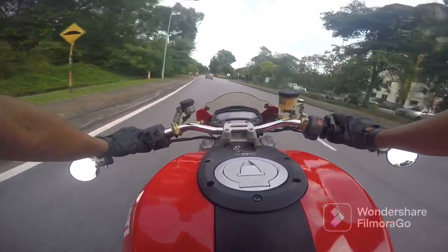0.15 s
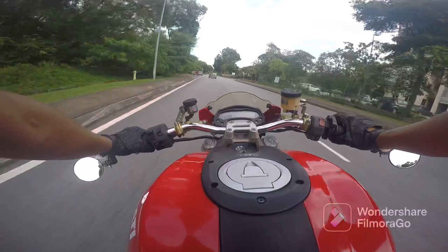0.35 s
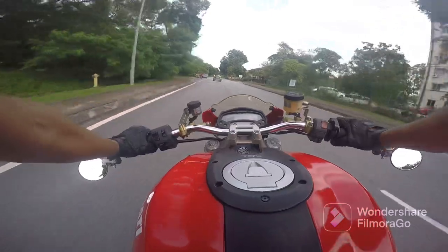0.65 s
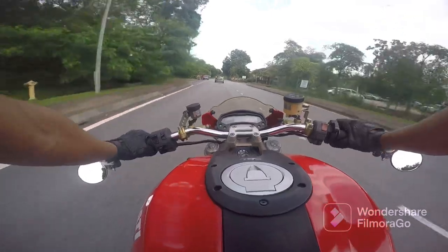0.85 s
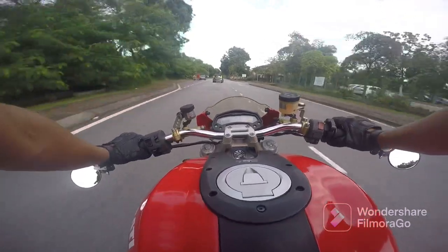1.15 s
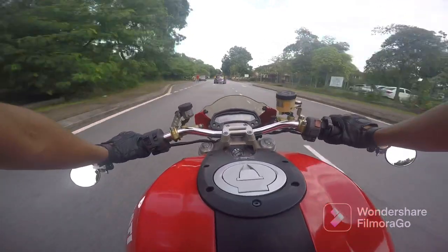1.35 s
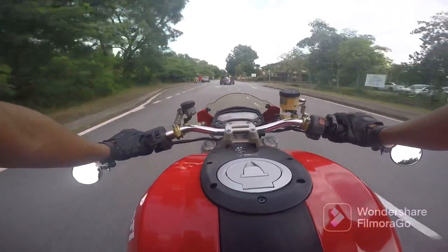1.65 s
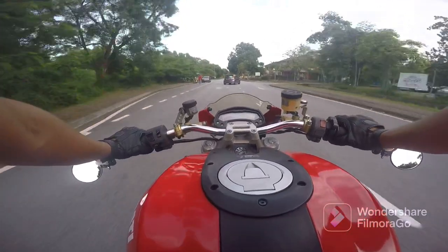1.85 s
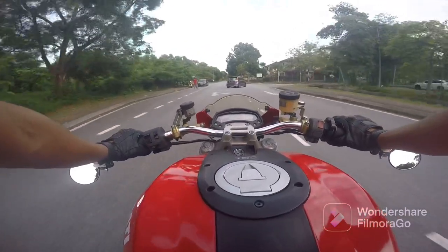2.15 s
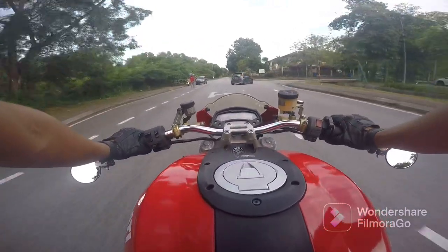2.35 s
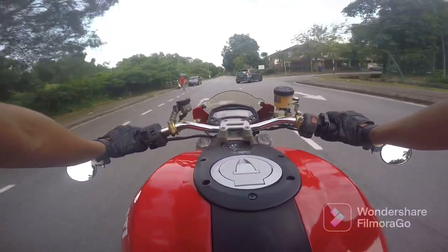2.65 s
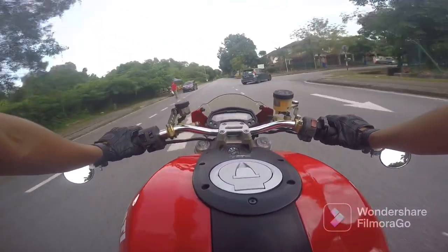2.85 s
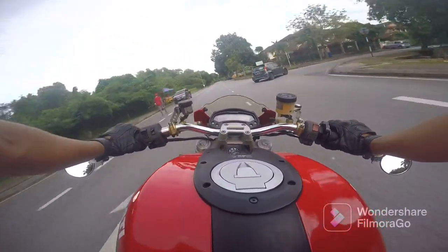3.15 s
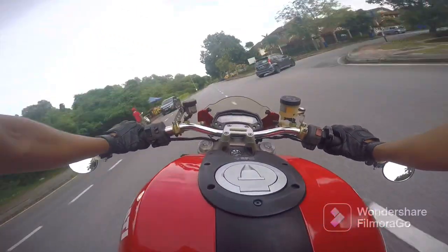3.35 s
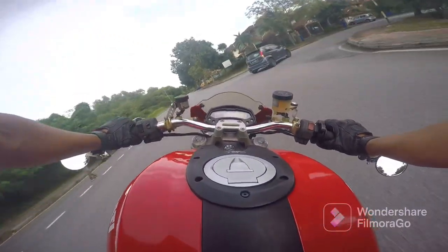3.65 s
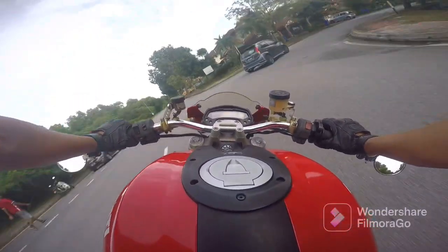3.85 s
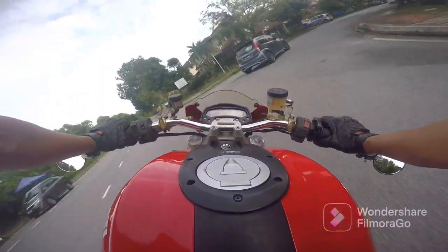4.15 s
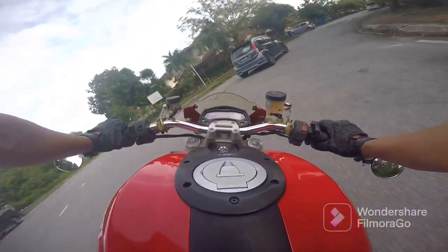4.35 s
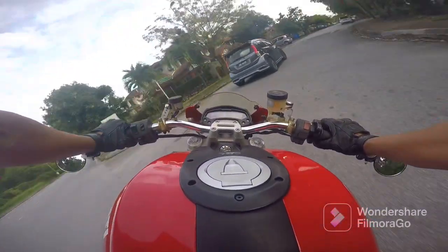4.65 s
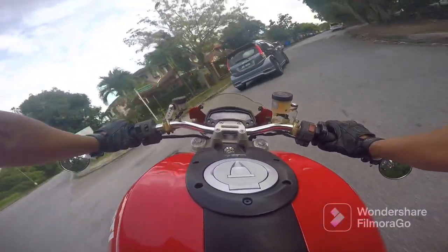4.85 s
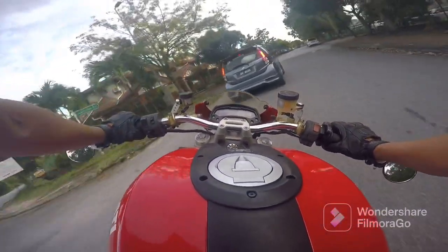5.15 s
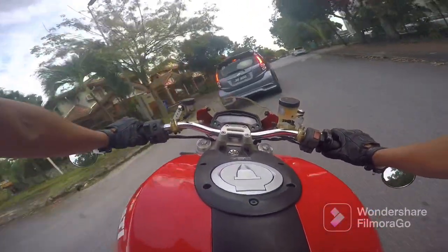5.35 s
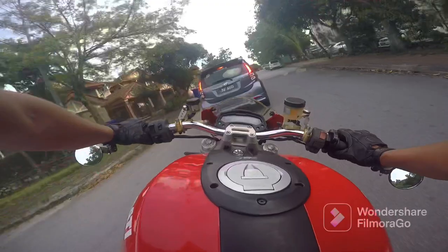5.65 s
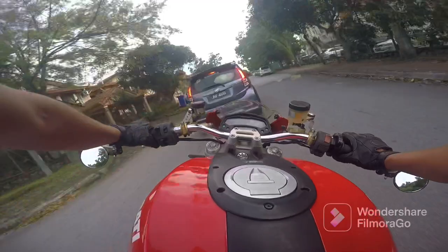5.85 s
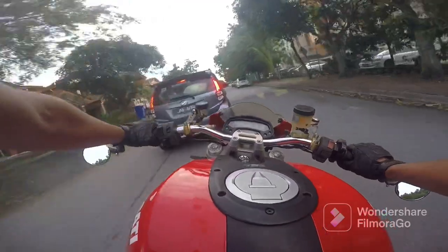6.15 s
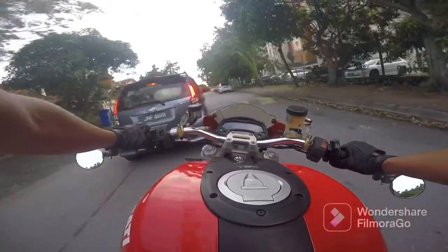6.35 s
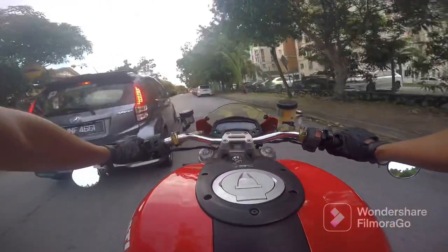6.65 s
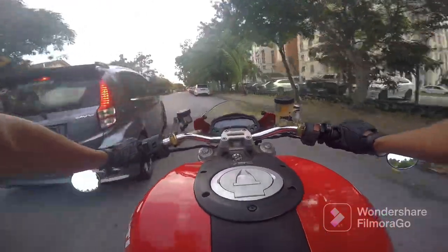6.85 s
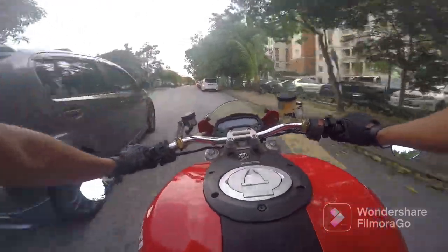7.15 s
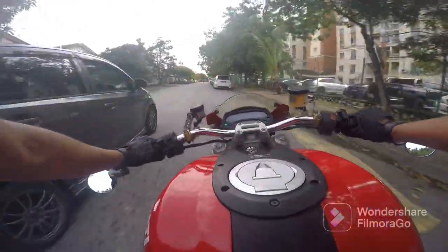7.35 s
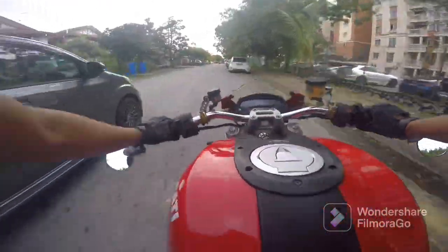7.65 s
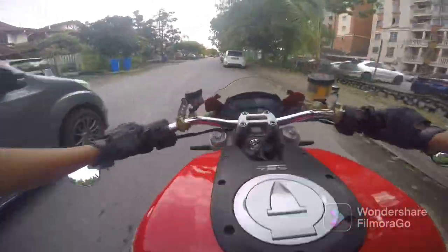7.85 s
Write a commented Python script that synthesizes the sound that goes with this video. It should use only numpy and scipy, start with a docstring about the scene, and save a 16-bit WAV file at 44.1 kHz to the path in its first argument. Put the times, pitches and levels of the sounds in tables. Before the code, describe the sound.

Onboard motorcycle outdoors on a road: low throbbing exhaust, dry mechanical rattle and soft wind buffeting. Early pops crackle as the throttle closes, then a quick rev and gear clunk raise the pitch. The engine coasts down for several seconds to a slow, irregular thudding. Another short blip with a knock comes late, then steady light throttle brings firmer, low-revving pulses to the end.

```python
"""A 90-degree V-twin motorcycle, heard from the rider's chest: it rolls off with a few pops in the exhaust,
shifts down, slows through a bend, shifts down again and pulls away gently.
Uneven exhaust pulses ring the silencer and header pipes as damped resonances; pops ring them too.
Valve taps, drive noise and gear teeth excite the cases; filtered noise beneath gives wind and tyre hiss."""
import sys
import numpy as np
from scipy import signal
from scipy.fft import rfft, irfft, next_fast_len
from scipy.io import wavfile
from scipy.ndimage import uniform_filter1d

SR = 44100
rng = np.random.default_rng(int(sys.argv[2]) if len(sys.argv) > 2 else 0)


def materialize(psi):
    """Save the field psi as 16-bit PCM at rate SR to the path in sys.argv[1].

    A 1-D psi becomes a single channel; in a 2-D psi each row is a channel.
    """
    bounded = np.clip(np.atleast_2d(psi).T, -1, 1)
    quanta = np.round(bounded * 32767).astype(np.int16)
    wavfile.write(sys.argv[1], SR, quanta)


N = 351918
TIME = np.arange(N) / SR

# one cycle is the four strokes, two crank turns; the second cylinder fires this fraction of it later
SECOND_CYLINDER = 450 / 720
IDLE_HZ = 14  # cycles per second

# silencer resonances: centre_hz, width_hz, level_db
SILENCER_MODES = [(66.8, 17.5, 34.5), (125.2, 24, 18)]
# crankcase and cover resonances: centre_hz, width_hz, level_db
CASE_MODES = [(755, 130, -10.5), (1003, 270, -9.5), (1690, 284, -8.5), (1870, 86, -11), (2312, 220, 0),
              (2530, 286, 0), (3380, 410, -5.5), (3644, 184, 1), (3880, 520, -9), (4170, 133, -6),
              (4585, 78, -8.5), (5540, 98, -21), (6660, 1100, -31.5), (7520, 570, -23.5)]
# throttle blips before the downshifts: start_s, rise_s, fall_s, added_cycles_per_s
THROTTLE_BLIPS = [(.65, .2, .18, 5.71), (6.3, .2, .37, 3.85)]


def undb(db):
    """Amplitude ratio: 20 dB is a factor of ten."""
    return 10 ** (np.asarray(db) / 20)


def curves(table):
    """Linear interpolation in time of every column after the first."""
    s, *columns = np.transpose(table)
    return [np.interp(TIME, s, column) for column in columns]


def unit(x):
    """Normalisation to an rms of 1."""
    return x / np.sqrt(np.mean(x ** 2))


def even(x, size=8000):
    """Slow gain control: the running rms is held near 1 while single pulses survive; size in samples."""
    power = uniform_filter1d(uniform_filter1d(x ** 2, size), size)
    return x / np.sqrt(power + 1e-18)


def resonate(x, modes, order=1):
    """Modal superposition: a sum of damped resonances; a higher order gives steeper skirts."""
    out = 0
    for hz, width_hz, db in modes:
        b, a = signal.iirpeak(hz, hz / width_hz, SR)
        sections = np.tile(np.r_[b, a], (order, 1))
        out = out + undb(db) * signal.sosfilt(sections, x)
    return out


def lowpass(x, hz, order=2):
    """Low-pass filtering: the spectrum rolls off above hz."""
    return signal.sosfilt(signal.butter(order, hz, fs=SR, output="sos"), x)


def colour(x, points):
    """Spectral shaping by (hz, level_db) points joined along a logarithmic frequency axis."""
    hz, db = np.transpose(points)
    size = next_fast_len(N)
    f = np.maximum(np.fft.rfftfreq(size, 1 / SR), 1)
    gain = undb(np.interp(np.log(f), np.log(hz), db))
    return irfft(rfft(x, size) * gain, size)[:N]


def walk(rate):
    """Slow random fluctuation, spread near 1: rate random steps per second, smoothed twice."""
    k = int(SR / rate)
    steps = np.repeat(rng.standard_normal(N // k + 1), k)
    return 0.72 * uniform_filter1d(uniform_filter1d(steps, k), k)[:N]


def impulses(times, sizes):
    """Impulse excitation: one click of the given size at each time."""
    samples = np.clip(np.asarray(times) * SR, 0, N - 1).astype(int)
    return np.bincount(samples, sizes, N)


def fade(clicks, time_s):
    """Exponential decay: every click gains a tail with this time constant."""
    return signal.lfilter([1], [1, -np.exp(-1 / (time_s * SR))], clicks)


def puffs(clicks, time_s):
    """Turbulence: a decaying noise burst after each click, its energy independent of its length."""
    return fade(clicks, time_s) * rng.standard_normal(N) * np.sqrt(2 / (time_s * SR))


def hump(start_s, length_s):
    """Half-sine pulse: a smooth rise from 0 to 1 and back."""
    return np.sin(np.pi * np.clip((TIME - start_s) / length_s, 0, 1))


def road_air():
    """Turbulent flow is broadband: wind buffets the microphone; tyres and passing air hiss."""
    # air and tyre hiss: time_s, level_db
    hiss_levels = [(.4, -67), (2, -71), (4.3, -65.5), (5.5, -73), (6.7, -97), (7.6, -72)]
    # wind: time_s, level_db
    wind_levels = [(0, -36.5), (3, -41), (7.98, -50)]
    # spectrum of the hiss: frequency_hz, level_db
    hiss_spectrum = [(2000, -29), (5500, 3.5), (7000, 13), (8500, 5.5), (10000, -1), (12000, -10),
                     (15000, -17)]
    # spectrum of wind on the microphone: frequency_hz, level_db
    wind_spectrum = [(8, -43), (24, -1), (45, -4), (90, -8.5), (180, -19.5), (400, -33.5), (1000, -37.5),
                     (4000, -77)]
    (hiss_db,), (wind_db,) = curves(hiss_levels), curves(wind_levels)
    hiss = unit(colour(rng.standard_normal(N), hiss_spectrum)) * undb(hiss_db + 0.48 * walk(25))
    wind = unit(colour(rng.standard_normal(N), wind_spectrum)) * undb(wind_db + 2 * walk(5.86))
    return hiss + wind


def engine_speed():
    """Rigid gearing: the road turns the engine; each blip spins it up and lets it sink back."""
    # engine speed, stepping up from 1.03 s when the lower gear bites: time_s, cycles_per_s
    road_speed = [(0, 28.55), (.3, 28.27), (1.03, 24.51), (1.23, 31.07), (1.7, 29.05), (2.9, 25.39),
                  (3.8, 24.12), (4.5, 21.03), (5.6, 15.29), (6.3, 13.43), (7.15, 13.295), (7.8, 15.26),
                  (7.98, 14.33)]
    cycle_hz = curves(road_speed)[0]
    for s, rise, fall, hz in THROTTLE_BLIPS:
        cycle_hz = cycle_hz + np.interp(TIME, [s, s + rise, s + rise + fall], [0, hz, 0])
    return cycle_hz


def drive():
    """Firing strength from 0 to 1 is a sum of contributions: the grip, the blips and catches near idle."""
    # twist grip, nearly shut until the bike pulls away: time_s, throttle
    grip = [(6.78, 0.2), (6.9, 0.9), (7.6, 0.89), (7.98, 1)]
    # near idle the engine catches for a few strokes: start_s, length_s, strength
    catch_times = [(5.572, 0.26, 0.31), (5.94, 0.15, 0.48), (6.404, 0.25, 0.3)]
    blip_open_s, blip_full_hz = 0.19, 9.6  # throttle opening time; speed that a wide-open blip adds
    blips = sum(hz / blip_full_hz * hump(s, blip_open_s) for s, _, _, hz in THROTTLE_BLIPS)
    catches = sum(strength * hump(s, length) for s, length, strength in catch_times)
    return np.clip(curves(grip)[0] + blips + catches, 0, 1)


def coasting(cycle_hz, db, knee_hz, slope_db):
    """Pumping without combustion: an exhaust layer is steady above the knee and fades below it."""
    return undb(db - slope_db * np.maximum(knee_hz - cycle_hz, 0))


def loudness(cycle_hz, throttle):
    """Bark and rattle gains grow with engine speed and throttle; coasting boom, fading below a knee,
    crossfades to a fixed driven level."""
    # coasting boom: level_db, knee_cycles_per_s, loss_db_per_cycle_per_s
    coast_boom = (-30.5, 19.75, 3)
    # coasting bark: level_db, knee_cycles_per_s, loss_db_per_cycle_per_s
    coast_bark = (-43, 26.26, 2.36)
    drive_boom_db = -32.5
    # levels at idle speed and their growth per doubling of it
    drive_bark_db, bark_db_per_octave = -43.5, 10
    rattle_db, rattle_db_per_octave, rattle_drive_db = -53, 8.5, 5
    octaves = np.log2(cycle_hz / IDLE_HZ)
    boom = (1 - throttle) * coasting(cycle_hz, *coast_boom) + throttle * undb(drive_boom_db)
    driven_bark = throttle ** 2 * undb(drive_bark_db + bark_db_per_octave * octaves)
    bark = np.hypot(coasting(cycle_hz, *coast_bark), driven_bark)
    rattle = undb(rattle_db + rattle_db_per_octave * octaves + rattle_drive_db * throttle ** 2)
    return boom, bark, rattle


def strokes(cycles, offset, lead_s=.0018):
    """Phase crossings of the cycle; each is placed lead_s early, making up for the delay of the filters."""
    return np.interp(np.arange(offset, cycles[-1], 1), cycles, TIME) - lead_s


def gear_knocks(ring_s=0.017):
    """Impact excitation: shift dogs and levers land with a short rattle of the cases."""
    # gearbox and lever knocks: time_s, level_db
    knocks = [(0.744, -47), (0.793, -44.5), (6.182, -46.5), (6.387, -51), (6.405, -40.5), (6.576, -48)]
    s, db = np.transpose(knocks)
    noise = rng.standard_normal(N)
    ring = resonate(noise, CASE_MODES, order=2) + resonate(noise, [(2456, 220, 7)], order=2)
    return fade(impulses(s, undb(db)), ring_s) * unit(ring)


def gear_whine(cycles, flutter=1.5):
    """Tooth meshing with phase modulation: the timing gear sings out as it sweeps the cover's resonances."""
    # cover resonances: centre_hz, width_hz, level_db
    cover_modes = [(1330, 76, -63), (1650, 96, -56), (1826, 105, -59.5)]
    teeth_per_cycle = 65
    # the crank speeds and slows within each cycle
    swing = 1.97 * np.sin(2 * np.pi * cycles)
    mesh = np.sin(2 * np.pi * teeth_per_cycle * cycles + flutter * walk(130) + swing)
    return resonate(unit(mesh * undb(5.4 * walk(40))), cover_modes)


def cases(x, wander_db=4.9):
    """Structural transmission: the metal is heard through panels that swell and ebb separately."""
    # broad spectrum of the rattle: frequency_hz, level_db
    rattle_spectrum = [(200, 2.5), (450, -9.5), (650, -8), (1300, -6), (2000, -2), (2900, -3), (4400, -1.5),
                       (5000, -16), (7700, -24), (8600, -26), (15000, -39)]
    panels = sum(resonate(x, [mode], order=2) * undb(wander_db * walk(7)) for mode in CASE_MODES)
    return panels + colour(x, rattle_spectrum)


def machinery(cycles, throttle, clatter_db=-5, tap_s=0.0035, tap_scatter_db=3, throb=0.15,
              coast=0.039, load=0.13, count=8):
    """Periodic impacts over modulated noise: valves clatter on the rush of chain, belts and clutch."""
    # eight valve seatings a cycle, four for each cylinder
    offsets = [(start + k / count * 2) % 1 for start in (0, SECOND_CYLINDER) for k in range(count // 2)]
    times = np.concatenate([strokes(cycles, offset) for offset in offsets])
    times = times + 0.00043 * rng.standard_normal(len(times))
    taps = impulses(times, undb(tap_scatter_db * rng.standard_normal(len(times))))
    clatter = even(puffs(uniform_filter1d(taps, size=90), tap_s))
    # the rush throbs once a crank turn
    rush = rng.standard_normal(N) * (1 + throb * np.cos(4 * np.pi * cycles))
    # the pair of power strokes loads the drive once a cycle, more so under throttle
    surge = 1 + (coast + load * throttle) * np.cos(2 * np.pi * cycles)
    return unit(cases((rush + undb(clatter_db) * clatter) * surge))


def pops(crack_hz=600, thump_hz=220, gas_db=-10, gas_s=0.0075):
    """Impulsive combustion: unburnt fuel cracks through the pipe; gas rumbles after; the silencer thumps."""
    # pops, the loudest entry setting the layer's peak: time_s, crack_db, thump_db
    pop_times = [(.1713, -19.5, -28), (.3490, -25, -54), (.6990, -28, -32), (.7360, -31, -45),
                 (.7490, -21.5, -25.5), (.7703, -20, -55), (.7814, -40, -29), (2.392, -31, -46),
                 (3.086, -33, -51), (5.7125, -48, -47), (6.394, -35, -28), (6.417, -38.5, -24)]
    # ring of a pop: centre_hz, width_hz, level_db
    pop_modes = [(263.5, 48, 15), (297, 35, 20), (384, 98, -9), (690, 180, -10)]
    s, crack_db, thump_db = np.transpose(pop_times)
    bangs = impulses(s, undb(crack_db))
    gas = undb(gas_db) * puffs(bangs, gas_s)
    crack = lowpass(resonate(bangs + gas, pop_modes), crack_hz, order=4)
    thump = lowpass(resonate(impulses(s, undb(thump_db)), SILENCER_MODES), thump_hz, order=4)
    crack = crack * undb(crack_db.max()) / np.abs(crack).max()
    thump = thump * undb(thump_db.max()) / np.abs(thump).max()
    return crack - thump


def exhaust(cycles, throttle, idling, boom_gain, bark_gain, soft_db=-6, second_db=1, stumble=.04,
            stumble_db=-8, edge_hz=152, idle_edge_hz=110, bark_edge_hz=450, soft_hz=400, gas_db=-7, gas_s=0.018):
    """Pulse-excited resonators: two cylinders, 450 and 270 degrees apart, pulse into one pipe."""
    # header pipe resonances: centre_hz, width_hz, level_db
    pipe_modes = [(259.3, 54, 2.5), (283.8, 25, -5), (344, 15, -10.5)]
    pipe_note = (277.6, 50, 0)  # centre_hz, width_hz, level_db
    idle_note_db, note_db = -60.5, -8.5  # the note's level at idle, and against the bark
    # scatter between pulses grows from smooth running to a lumpy, coasting idle
    smooth_scatter_db, lumpy_scatter_db = 0.83, 3
    scatter_db = smooth_scatter_db + (lumpy_scatter_db - smooth_scatter_db) * idling
    first, second = strokes(cycles, 0), strokes(cycles, SECOND_CYLINDER)
    # one scatter for the flow of each pulse, another for its front
    flow_a, front_a = rng.standard_normal((len(first), 2)).T * np.interp(first, TIME, scatter_db)
    flow_b, front_b = rng.standard_normal((len(second), 2)).T * np.interp(second, TIME, scatter_db)
    # off throttle a stroke of the second cylinder now and then comes out weak
    weak = rng.random(len(second)) < stumble * (1 - np.interp(second, TIME, throttle))
    early = impulses(first, undb(flow_a))
    late = impulses(second, undb(flow_b + second_db + stumble_db * weak))
    # off throttle the second pulse is blunt
    flow = early + throttle * late + (1 - throttle) * lowpass(late, soft_hz, order=1)
    boom = lowpass(resonate(flow, SILENCER_MODES), edge_hz, order=4)
    # the slow pulses of an idling engine are duller
    boom = even((1 - idling) * boom + idling * lowpass(boom, idle_edge_hz))
    # only steep fronts ring the headers; ragged burning trails more turbulence
    late_fronts = impulses(second, undb(front_b)) * undb(soft_db * (2 - throttle))
    fronts = impulses(first, undb(front_a)) + late_fronts
    gas = undb(gas_db) * scatter_db * puffs(fronts, gas_s)
    bark = even(lowpass(resonate(fronts + gas, pipe_modes), bark_edge_hz, order=4))
    # the pipe's own note hums on at idle and grows with the bark
    note_gain = np.hypot(undb(idle_note_db), undb(note_db) * bark_gain)
    note = even(resonate(fronts + gas, [pipe_note], order=2)) * note_gain
    # the front arrives as a push, the silencer answers with a suck
    return bark * bark_gain + note - boom * boom_gain


def scene():
    """Common phase: one crank drives exhaust and machinery together."""
    cycle_hz, throttle = engine_speed(), drive()
    cycles = np.cumsum(cycle_hz) / SR
    smooth_above_hz = 20.1  # cycles per second
    idling = np.interp(cycle_hz, [IDLE_HZ, smooth_above_hz], [1, 0]) * (1 - throttle)
    boom, bark, rattle = loudness(cycle_hz, throttle)
    pipes = exhaust(cycles, throttle, idling, boom, bark) + pops()
    metal = machinery(cycles, throttle) * rattle + gear_whine(cycles) + gear_knocks()
    return (pipes + metal + road_air())[None]


def record(dry):
    """Band limiting: a steep elliptic low-pass removes the extreme treble."""
    top_hz = 15250
    return signal.sosfilt(signal.ellip(10, .2, 70, top_hz, fs=SR, output="sos"), dry)


dry = scene()
out = record(dry)
materialize(out)
```